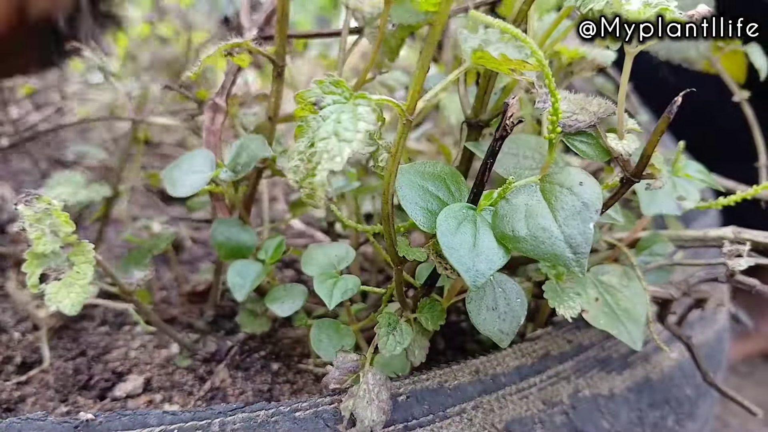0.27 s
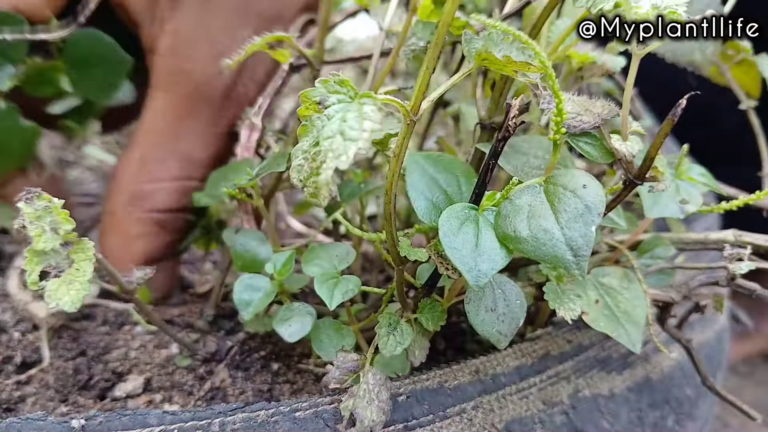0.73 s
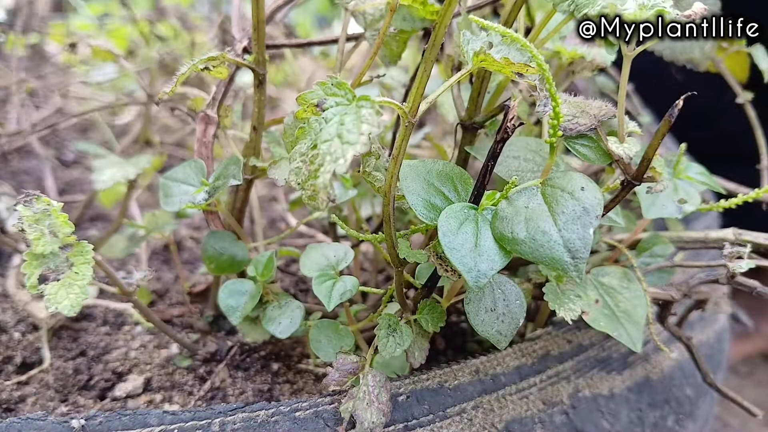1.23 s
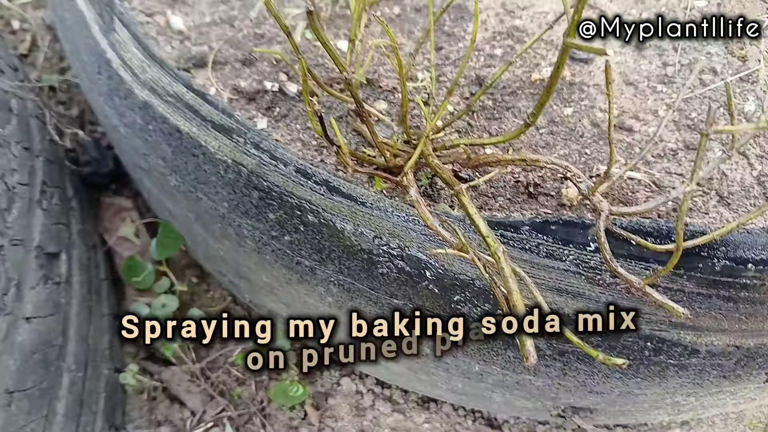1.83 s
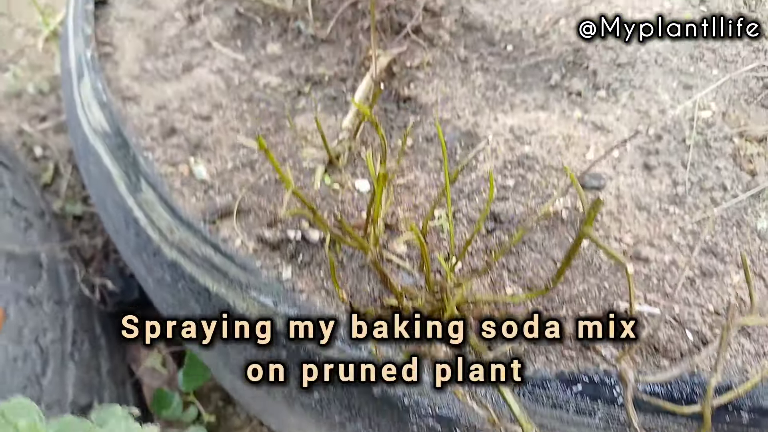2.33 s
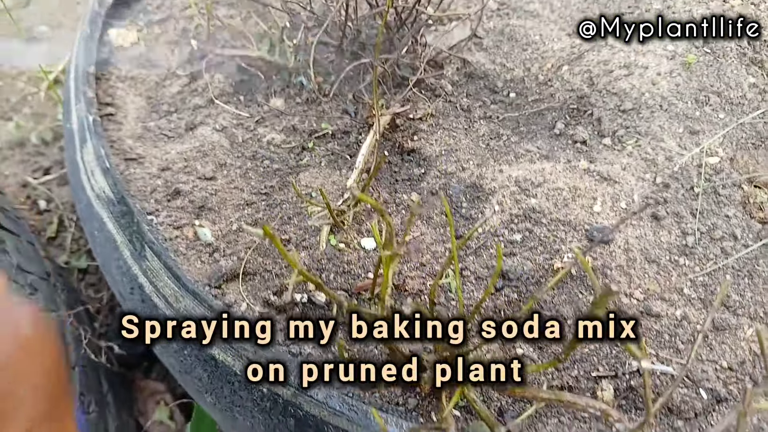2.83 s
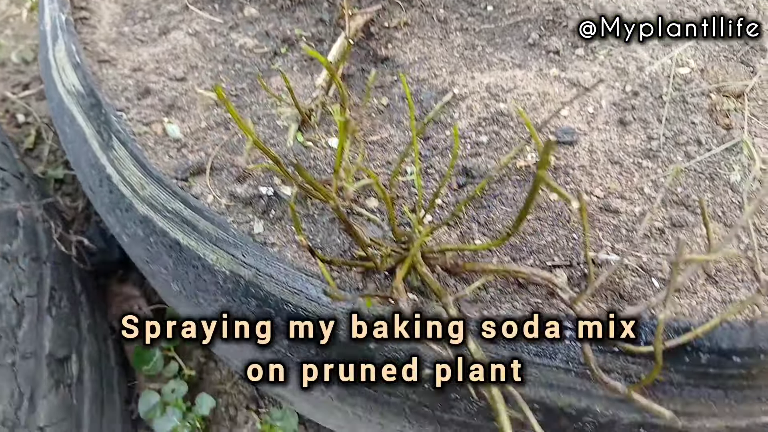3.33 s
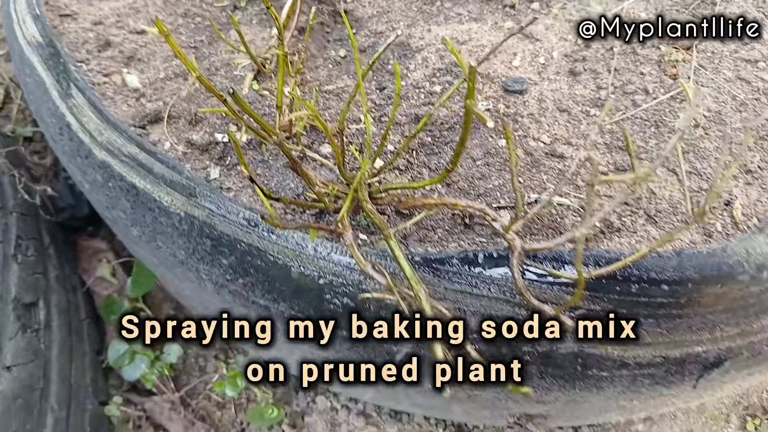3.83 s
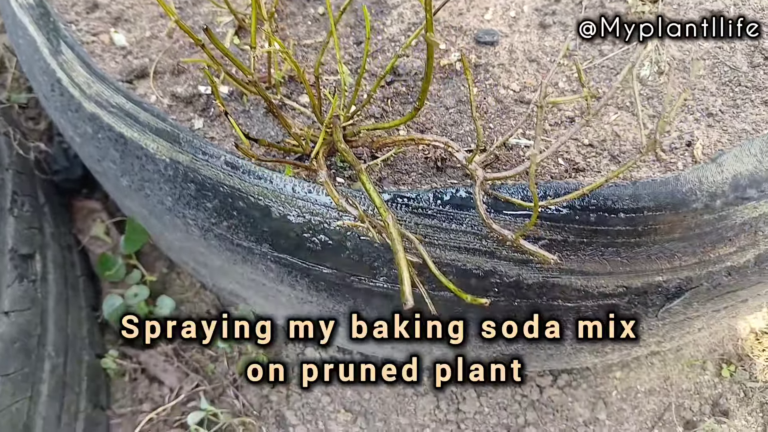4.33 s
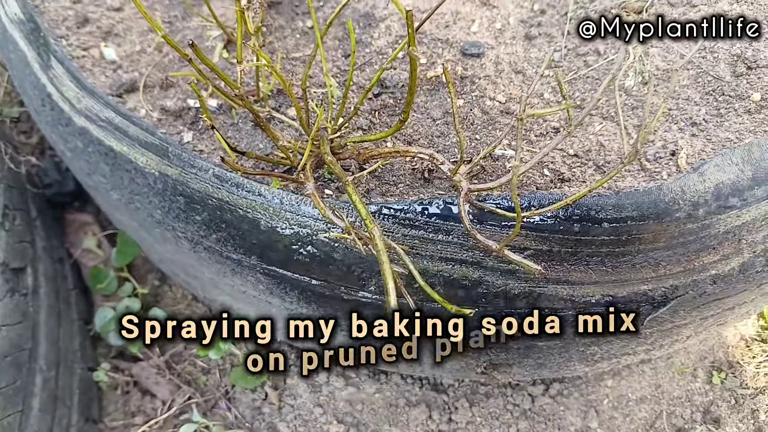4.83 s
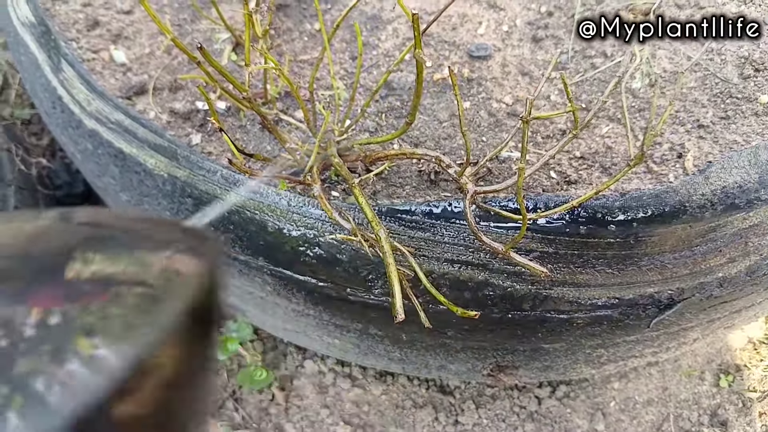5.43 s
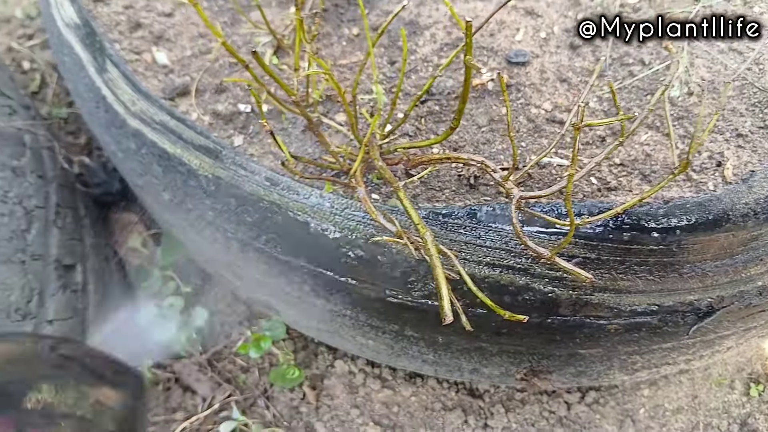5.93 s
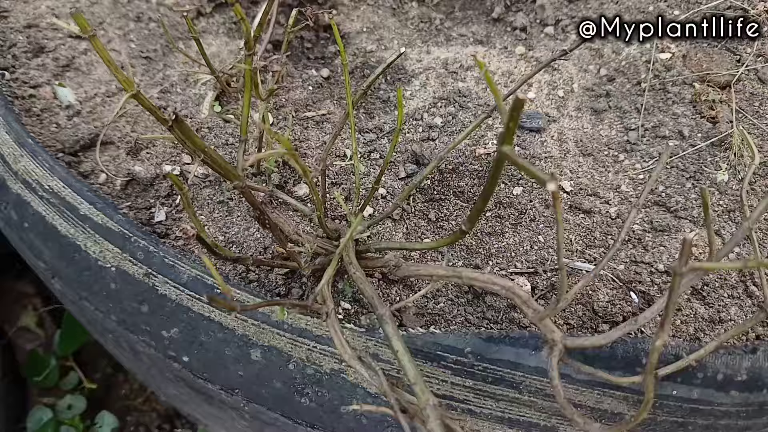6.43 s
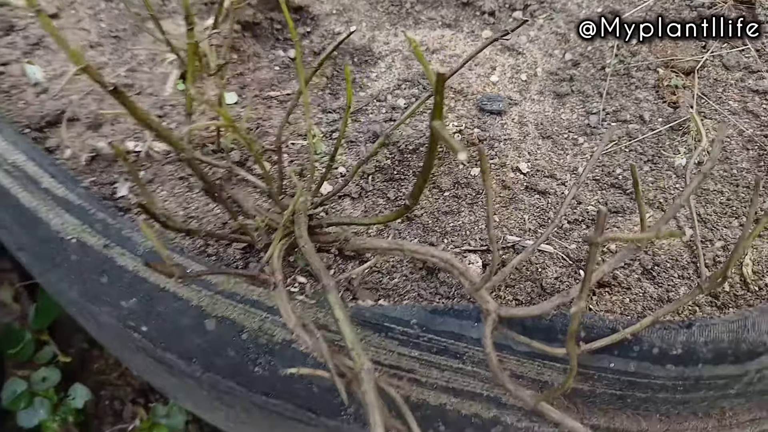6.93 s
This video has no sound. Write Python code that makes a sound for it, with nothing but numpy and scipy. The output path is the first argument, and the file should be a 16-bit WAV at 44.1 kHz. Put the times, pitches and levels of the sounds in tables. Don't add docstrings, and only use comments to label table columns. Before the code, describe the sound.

Close outdoor stereo pickup in a quiet garden. A hand pushes through dry leaves with grainy rustles and small ticks, then pumps a trigger spray bottle about three times a second. Each squeeze gives a short hiss, wet gurgle and hollow plastic clacks. Low wind and handling rumble swells on the right. The spraying stops abruptly, and after a brief quiet a finger scrapes and bumps the left microphone.

```python
import sys
import numpy as np
from scipy import signal
from scipy.fft import rfft, irfft, next_fast_len
from scipy.io import wavfile

SR = 44100
rng = np.random.default_rng(int(sys.argv[2]) if len(sys.argv) > 2 else 0)


def to_wav(sig):
    pcm = np.clip(np.atleast_2d(sig), -1, 1) * 32767
    pcm = np.round(pcm).astype(np.int16)
    wavfile.write(sys.argv[1], SR, pcm.T)


def ratio(d):
    e = np.asarray(d, float) / 20
    return 10 ** e


N = 317079


def rms_one(x):
    return x / np.sqrt(np.mean(x ** 2) + 1e-20)


def in_time(rows, outside=None):
    s, *columns = np.transpose(rows)
    t = np.arange(N) / SR
    return [np.interp(t, s, column, outside, outside) for column in columns]


def swell(s, length, db):
    phase = np.clip((np.arange(N) / SR - s) / length, -.5, .5)
    return ratio(db) * np.cos(np.pi * phase) ** 2


def drift(rate_hz, channels=1):
    r = np.exp(-2 * np.pi * rate_hz / SR)
    white = rng.standard_normal((channels, N + SR))
    return rms_one(signal.lfilter([1], [1, -2 * r, r * r], white)[:, SR:])


def pair(alike):
    shared, own = rng.standard_normal(N), rng.standard_normal((2, N))
    alike = np.clip(alike, 0, 1)
    return np.sqrt(alike) * shared + np.sqrt(1 - alike) * own


def colour(x, spectrum):
    size = next_fast_len(N)
    hz, db = np.transpose(spectrum)
    bins_hz = np.arange(size // 2 + 1) * SR / size
    gain = ratio(np.interp(np.log(bins_hz + 1), np.log(hz), db))
    return rms_one(irfft(rfft(x, size) * gain, size)[..., :N])


def band(x, low_hz, high_hz):
    return signal.sosfilt(signal.butter(2, [low_hz, high_hz], "band", fs=SR, output="sos"), x)


def ring(clicks, hz, t60):
    r, w = ratio(-60 / (t60 * SR)), 2 * np.pi * hz / SR
    return signal.lfilter([0, np.sin(w)], [1, -2 * r * np.cos(w), r * r], clicks + 1e-18)


def bursts(times, gains, t60):
    clicks = np.zeros((2, N))
    clicks[:, (np.asarray(times) * SR).astype(int)] = gains
    return signal.lfilter([1], [1, -ratio(-60 / (t60 * SR))], clicks + 1e-18)


def sides(pan_db):
    return ratio(np.array([pan_db / 2, -pan_db / 2]))


def garden_air():
    # frequency in Hz, level in dB per Hz.
    murmur = [(71, 2.5), (120, 2.5), (663, -16.5), (1450, -15), (2330, -19.5), (4150, -21.5), (6950, -34),
              (8710, -25), (13700, -24.5), (15500, -22.5), (16500, -63)]
    # time in seconds, level in dB.
    murmur_swell = [(0.0, -72), (1.3, -74.5), (1.82, -68.5), (1.96, -65.5), (6.23, -68), (6.55, -69.5),
                    (7.19, -65)]
    level_db = in_time(murmur_swell)[0] + 9.5 + drift(5.6)
    return ratio(level_db) * colour(pair(alike=0.14), murmur)


def ports():
    # time in seconds, level in dB.
    breeze_level = [(0, -48), (.08, -66), (1.58, -68.5), (1.9, -59), (3.3, -55), (3.6, -59.5), (5.9, -60.5),
                    (6.4, -55), (6.85, -52.5), (7.0, -71), (7.19, -63)]
    # middle in seconds, length in seconds, level in dB.
    gust_rows = [(1.713, 0.11, -57), (3.33, 0.087, -48), (3.46, 0.22, -36.5), (3.683, 0.13, -43),
                 (3.807, 0.079, -37.5), (3.961, 0.31, -33), (4.232, 0.31, -36.5), (4.467, 0.19, -44),
                 (4.65, 0.37, -45), (4.86, 0.33, -46), (5.086, 0.34, -44.5), (5.33, 0.19, -36),
                 (5.669, 0.28, -42), (5.848, 0.21, -47)]
    port_hz, port_width_hz = 77, 15
    white = rng.standard_normal((2, N + SR))
    tuned = rms_one(ring(white, port_hz, 2.7 / port_width_hz)[:, SR:])
    lumps = rms_one(band(white, 29.0, 94.0)[:, SR:])
    rumble = rms_one(tuned + 0.024 * lumps)

    breeze = ratio(in_time(breeze_level)[0] + 4) * sides(-8)[:, None]
    gusts = sum(swell(*row) for row in gust_rows) * ratio([[-16], [6]])
    touch = swell(6.99, 0.12, -27) * [[1], [0]]
    flap = rms_one(band(band(white, 103, 159), 103, 159)[:, SR:])
    buffet = ratio(15.5) * gusts ** 2 * flap
    return np.sqrt(breeze ** 2 + gusts ** 2 + touch ** 2) * rumble + buffet


def leaves():
    # time in seconds, peak in dB, left-right difference in dB.
    snaps = [(0.0149, -48, -5), (0.079, -33, -5), (0.257, -29, 3), (0.475, -40, -6), (0.534, -43, -4),
             (0.5496, -47, -9), (0.5824, -38, -1), (0.6065, -40, -4), (0.6456, -39, -4), (0.7966, -49, -5),
             (1.029, -47, 13), (1.041, -36, -10), (1.302, -42, 10), (1.338, -38.5, 6), (1.4263, -47, -1),
             (1.4501, -63, 5.0), (1.483, -37, 16), (1.572, -31.5, 9), (1.691, -45, 11), (1.715, -36, 8),
             (1.747, -34, 13), (1.804, -29, 5.0)]
    # middle in seconds, level in dB, fading to either side in dB per second.
    pushes = [(.03, -45.5, 161), (.28, -64, 32), (.6, -61, 22), (.808, -51.5, 500), (.94, -54.5, 246),
              (1.046, -49.5, 991), (1.2, -61, 250), (1.305, -59.5, 498), (1.496, -48, 184),
              (1.78, -57.5, 76)]
    # frequency in Hz, level in dB per Hz.
    rustle = [(880, -55), (1500, -12), (2790, -22), (3220, -15), (5150, -12), (15100, -3.5), (16000, -35),
              (16500, -32)]
    s, peak_db, pan_db = np.transpose(snaps)
    t = np.arange(N) / SR
    push_db = np.max([db - fade * np.abs(t - middle) for middle, db, fade in pushes], axis=0)
    push_db = push_db - 99 * (t > s[-1])
    grain = ratio(push_db + 3.7 * drift(130) - 2.5)
    ticks = bursts(s, ratio(peak_db - 11.0) * sides(pan_db), t60=0.013)
    return (grain + ticks) * colour(pair(alike=0.048), rustle)


def finger():
    # time in seconds, peak in dB, T60 in seconds.
    slip_rows = [(6.9107, -61, 0.005), (6.924, -24, 0.0018), (6.928, -21, 0.0067), (6.9308, -21.5, 0.0039),
                 (6.9381, -15, 0.003), (6.942, -26, 0.035), (6.949, -29, 0.022), (6.96, -27, 0.026),
                 (6.984, -31, 0.034), (7.001, -26.5, 0.023), (7.021, -42, 0.019), (7.033, -40, 0.0084),
                 (7.047, -45, 0.0071), (7.056, -47, 0.019), (7.117, -59, .02)]
    # frequency in Hz, level in dB per Hz.
    skin = [(290, -28), (500, -6.5), (1280, -10.5), (1450, -11), (3350, -8), (6660, -12), (10600, 2),
            (15600, -7), (16500, -44)]
    brush_s, rise_s, hold_s, brush_db, fade_db_per_s = 6.92, 0.0093, 0.1, -34.5, 270
    lift_s = 7.062
    turns = brush_s + np.cumsum([-.02, .02, rise_s, hold_s, 40 / fade_db_per_s])
    levels = brush_db - np.array([32, 16, 0, 3, 43])
    slide_db = in_time(np.c_[turns, levels], outside=-120)[0]
    slide_db = slide_db - 12 * (np.arange(N) > lift_s * SR)
    rub = ratio(slide_db + 2.0 * drift(200) - 3.5)
    slips = sum(bursts([s], ratio(db), t60) for s, db, t60 in slip_rows)
    scratch = (rub + slips) * colour(pair(alike=0.25), skin)

    bump_s, bump_db, bump_t60_s = 6.9642, -10, .13
    t = np.maximum(np.arange(N) / SR - bump_s, 0)
    swing = np.cos(2 * np.pi * 78 * t + .8 * (1 - np.exp(-t / .003)))
    dying = ratio(-60 * np.maximum(t - .012, 0) / bump_t60_s)
    bump = ratio(bump_db) * (t > 0) * swing * dying * [[1], [0]]
    return scratch * ratio([[5.5], [-11]]) + bump


def squeaks():
    # start in seconds, length in seconds, pitch in Hz, level in dB.
    seal = [
        (2.253, 0.04, 2310, -40),
        (2.516, 0.047, 2280, -48),
    ]
    t, out = np.arange(N) / SR, np.zeros(N)
    for s, length, hz, db in seal:
        arch = np.sin(np.pi * np.clip((t - s) / length, 0, 1)) ** .5
        out += ratio(db) * arch * np.sin(2 * np.pi * hz * t)
    return out


def contacts():
    # time in seconds, peak in dB, hardness in dB, left-right difference in dB.
    returns = [(1.909, -16.5, -10.5, 4), (2.186, -13.5, -15, 1), (2.463, -16.5, -17, -2.5),
               (2.971, -14.5, -8, -0.5), (3.264, -14.5, -7, 0.5), (3.584, -13.5, -6, -2.5),
               (4.141, -18.5, -0.5, 2.5), (4.409, -19, -4.5, -7), (4.778, -14.5, -5.5, -2.5),
               (5.147, -14.5, -5.5, 2.5), (5.495, -16, -6, -0.3), (5.797, -18, -7, -3.5),
               (6.104, -18.5, -7, 2.1), (6.445, -17.5, -4, 0)]
    # time in seconds, peak in dB, hardness in dB, left-right difference in dB.
    jolts = [(2.039, -12.5, -12.5, 3), (2.062, -43, -21, -1), (2.272, -20, -28, -2),
             (2.305, -18.5, -27, -2), (2.552, -16.5, -15, -4), (3.061, -22.5, -13, -1),
             (3.093, -18.5, -9.5, 0.5), (3.403, -20.5, -14, 0), (3.452, -16.5, -13, 1),
             (3.723, -15.5, -13, 1.5), (4.244, -20, -8, -8.5), (4.543, -32, -14.5, -12),
             (4.611, -14.5, -5.5, -2.5), (5.004, -12.5, -9, -7.5), (5.297, -18.5, -11, -3.5),
             (5.354, -15, -13.5, -5), (5.602, -25.5, -3, -0.5), (5.635, -22, -6, 3), (5.939, -15, -9, -3.5),
             (6.141, -26.5, -9, -1), (6.205, -31, -12, 0), (6.232, -26, -5.5, 4),
             (6.305, -15.5, -7.5, -0.5), (7.119, -43.5, -25, 4), (7.159, -46, -20, 7),
             (7.178, -39.5, -25, -1)]
    # time in seconds, peak in dB, left-right difference in dB.
    lever_ticks = [(1.809, -51, -1), (1.876, -28, 16), (1.955, -31.5, 3), (1.978, -41, 3), (2.154, -33, 2),
                   (2.42, -33, -3), (2.668, -33.5, 5), (2.925, -38.5, -6), (3.232, -48, 24),
                   (3.345, -40, -11), (3.556, -36, 1), (3.835, -29.5, -1), (4.09, -28, -0.5),
                   (4.37, -40, -15.5), (4.741, -33.5, 1), (5.12, -30.5, -3), (5.468, -37.5, -2),
                   (5.771, -42, -6), (6.081, -35, -2), (6.415, -44, -7), (6.66, -47.5, -18)]
    # how far that kind wakes the bottle, in dB
    rows = [(*row, -17.5) for row in returns]
    rows += [(*row, -14.5) for row in jolts]
    rows += [(s, db, -34.5, pan_db, -23.5) for s, db, pan_db in lever_ticks]
    s, peak_db, hard_db, pan_db, body_db = np.transpose(sorted(rows))
    body_db = body_db + 1.25 * (s - s.mean())
    contact_lag_s = .0008
    return s + contact_lag_s, peak_db, body_db, hard_db, pan_db


def knocks():
    # mode in Hz, level in dB, T60 in seconds.
    bottle = [
        (935, 3.5, 0.018),
        (1116, 5.5, 0.0088),
    ]
    # mode in Hz, level in dB, T60 in seconds.
    trigger = [(695, -12.5, 0.009), (1663, -2, 0.0087), (2156, 5.5, 0.0013), (3094, 11.5, 0.0054),
               (3510, 9, 0.0096), (4112, 0, 0.013), (4450, -39, 0.0056), (6140, -5, 0.0054),
               (7150, -54, .006), (10020, -1, 0.00097)]
    modes = bottle + trigger
    s, peak_db, body_db, hard_db, pan_db = contacts()
    at, gain = (s * SR).astype(int), ratio(peak_db) * sides(pan_db)
    chance = rng.normal(0, 1, (len(s), len(modes), 2))
    ringing = np.zeros((2, N))
    for k, (hz, db, t60) in enumerate(modes):
        hollow = k < len(bottle)
        share_db = body_db + 7.0 if hollow else hard_db * (hz > 2600) - 2.0
        strike = ratio(db + share_db + 2.2 * chance[:, k].T) * (-1) ** k
        clicks = np.zeros((2, N))
        clicks[:, at + 30 * hollow] = gain * strike
        ringing += ring(clicks, hz, t60)

    rattle = bursts(s, gain, t60=0.017) * pair(alike=0.23)
    rattle_db = np.clip(np.interp(np.arange(N), at, hard_db) / 4, -9, 0)
    rattle = band(band(rattle * ratio(rattle_db), 870, 4940), 940, 4250)
    return band(ringing, 486, 14300) + ratio(2.0) * rattle


def pressure(start_db, column):
    # valve opens in seconds, pressure builds in seconds, holds in seconds,
    # mist level in dB, level of the jet in the pump body in dB.
    squeezes = [(1.807, 0.0018, 0.0058, -48, -51.5), (1.969, 0.089, 0.011, -41, -45),
                (2.255, 0.058, 0.025, -45.5, -48.5), (2.513, 0.041, 0.037, -49.5, -53),
                (2.766, 0.039, 0.039, -53.5, -56.5), (3.051, 0.055, 0.04, -42, -44.5),
                (3.374, 0.099, 0.023, -44, -48.5), (3.668, 0.068, 0.031, -42, -47),
                (3.922, 0.066, 0.023, -41.5, -47.5), (4.216, 0.056, 0.027, -43, -48),
                (4.536, 0.07, 0.051, -37, -41), (4.922, 0.073, 0.044, -39, -43.5),
                (5.275, 0.07, 0.04, -45, -48), (5.585, 0.083, 0.026, -46, -48.5),
                (5.888, 0.076, 0.036, -45.5, -49), (6.214, 0.099, .015, -48, -52.5)]
    open_s, sag_s, dribble_s, dribble_db = 0.0045, 0.038, 0.11, -23
    out = 0
    for row in squeezes:
        s, build, hold, db = *row[:3], row[column]
        turns = s + np.cumsum([-open_s, open_s, build, hold, sag_s, dribble_s])
        levels = [-95, min(start_db, db), db, db - 2.5, db + dribble_db, db + 2 * dribble_db]
        out = out + ratio(in_time(np.c_[turns, levels], outside=-140)[0])
    return out


def spray():
    # time in seconds, gurgle in dB, spit at the nozzle in dB.
    squirts = [(1.808, -41, -56), (1.9782, -23.5, -44.5), (2.2577, -26, -57), (2.5157, -30, -57),
               (2.759, -33.5, -77), (3.0502, -29, -77), (3.3726, -32, -48), (3.671, -31.5, -59.5),
               (3.922, -31, -63.5), (4.2154, -33, -49), (4.5355, -32, -51), (4.9202, -34, -48),
               (5.2718, -30, -50), (5.585, -31, -67), (5.891, -28.5, -96), (6.2172, -28, -46.5)]
    # frequency in Hz, level in dB per Hz.
    mist_spectrum = [(2650, -3.5), (4500, 0.5), (5810, -3), (6690, -7), (8730, -1), (15100, -3),
                     (16200, -47), (16500, -55)]
    # frequency in Hz, level in dB per Hz.
    jet_spectrum = [(150, -32.5), (250, -33), (309, -8), (388, -3.5), (530, -7), (865, 3.5), (1230, -2),
                    (1460, 4.5), (2130, -12.5), (3560, -3.5), (5000, -46.5), (6500, -40), (11000, -120)]
    # time in seconds, left-right difference in dB.
    nozzle_swing = [(1.8, 3.5), (2.24, 1.7), (4.81, 1), (4.91, -2.5), (5.43, 0), (5.54, 1.5), (6.4, 0.5)]
    s, gurgle_db, spit_db = np.transpose(squirts)
    mist = colour(pair(alike=0.047), mist_spectrum) * ratio(2.0 * drift(162))
    jet = colour(pair(alike=0.64), jet_spectrum) * ratio(2.6 * drift(140))

    gap_s, loss_db = .007, 7.5
    spit = sum(bursts(s + k * gap_s, ratio(spit_db + 12.5 - k * loss_db), t60=0.014) for k in range(3))
    gurgle = rms_one(band(pair(alike=0.83), 1460, 1920))
    squirt = bursts(s, ratio(gurgle_db - 12), t60=0.2) * gurgle

    nozzle = pressure(-54.5, column=3) * mist + spit * band(mist, 6700, 19000)
    nozzle = sides(in_time(nozzle_swing)[0]) * nozzle * ratio(3.0)
    return nozzle + pressure(-60, column=4) * jet * ratio(6.5) + squirt


def scene():
    left, right = leaves() + finger() + squeaks() + knocks() + spray()
    right_lag, bass_lag, shadow_hz = 19, 8, 1400
    lows = signal.sosfiltfilt(signal.butter(2, shadow_hz, fs=SR, output="sos"), right)
    near = np.array([left, np.roll(lows, bass_lag) + np.roll(right - lows, right_lag)])
    return near + ports() + garden_air()


def top_cut(x):
    return signal.sosfilt(signal.butter(12, 17010, fs=SR, output="sos"), x)


def record(dry):
    dip = 1 - np.minimum(3 * swell(6.4585, .016, 0), 1)
    mix = band(dry, 45, 21700) * dip
    return top_cut(mix)


dry = scene()
out = record(dry)
to_wav(out)
```